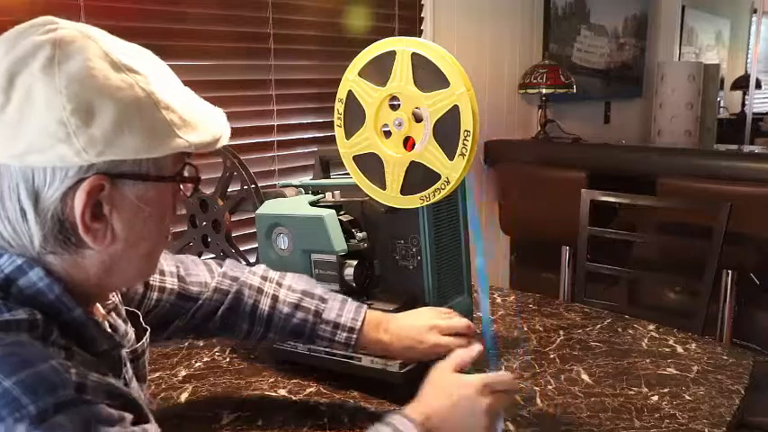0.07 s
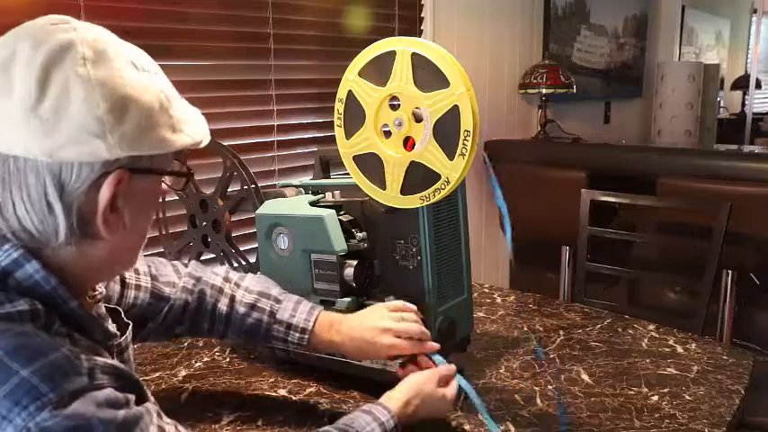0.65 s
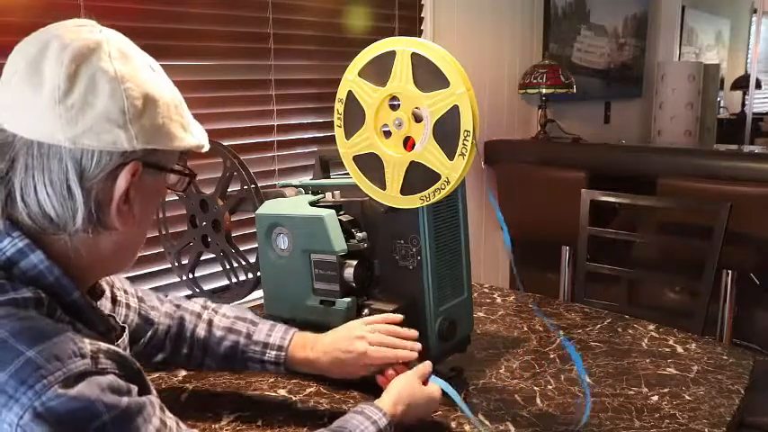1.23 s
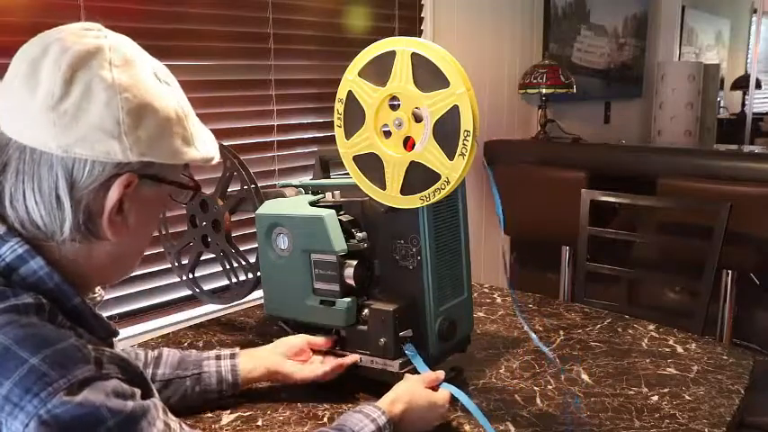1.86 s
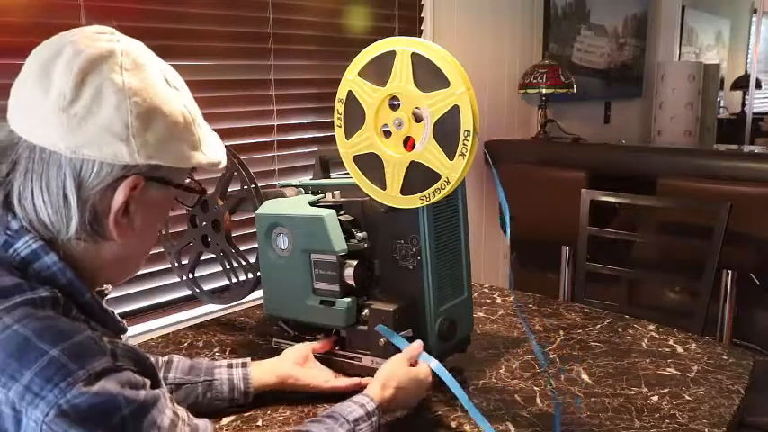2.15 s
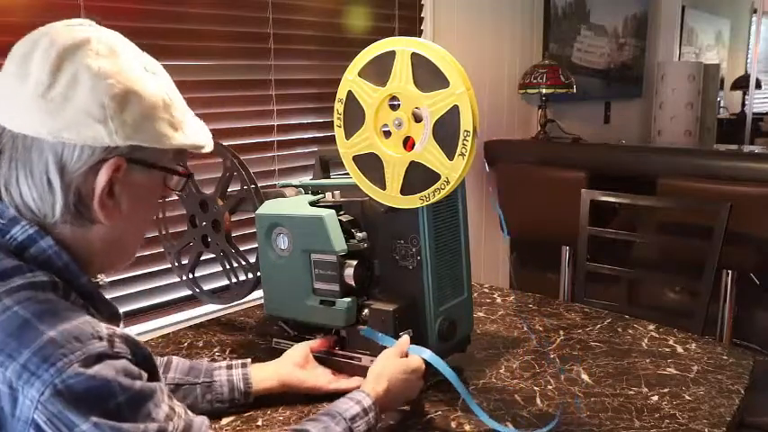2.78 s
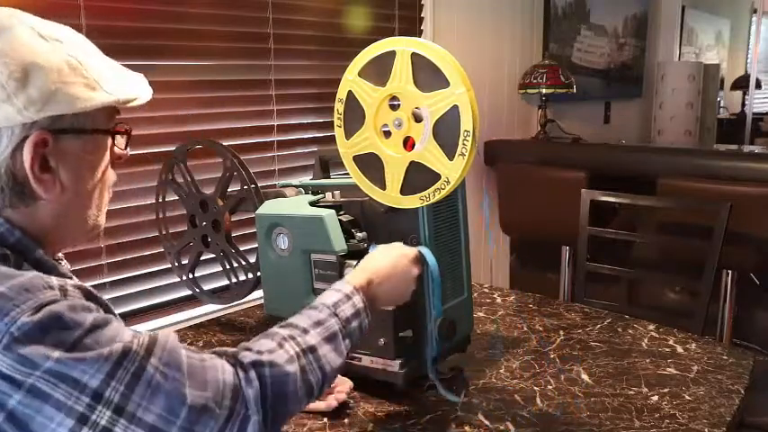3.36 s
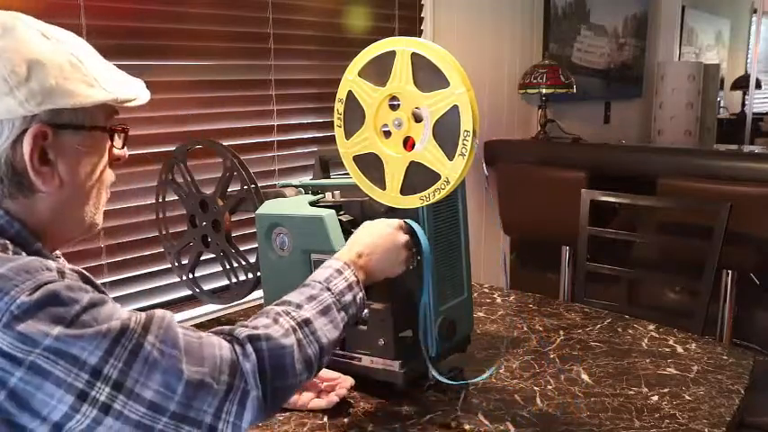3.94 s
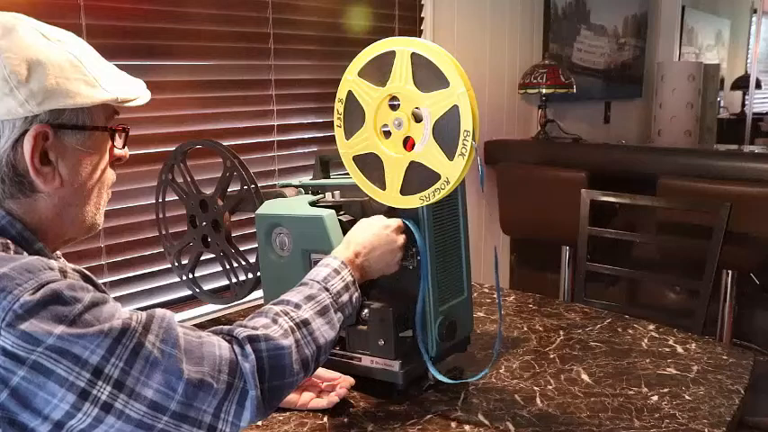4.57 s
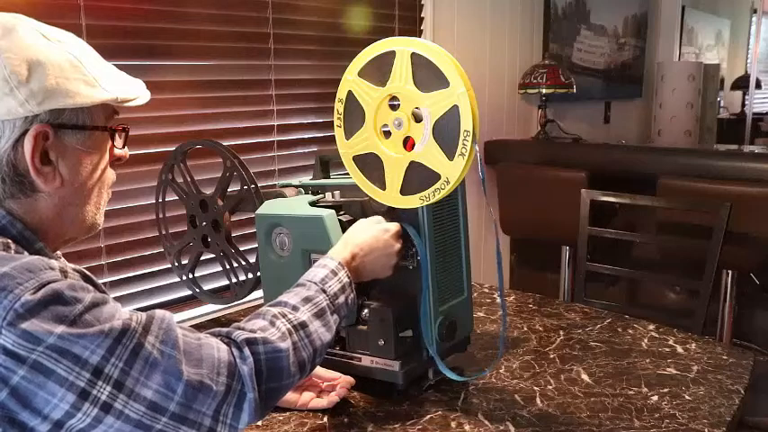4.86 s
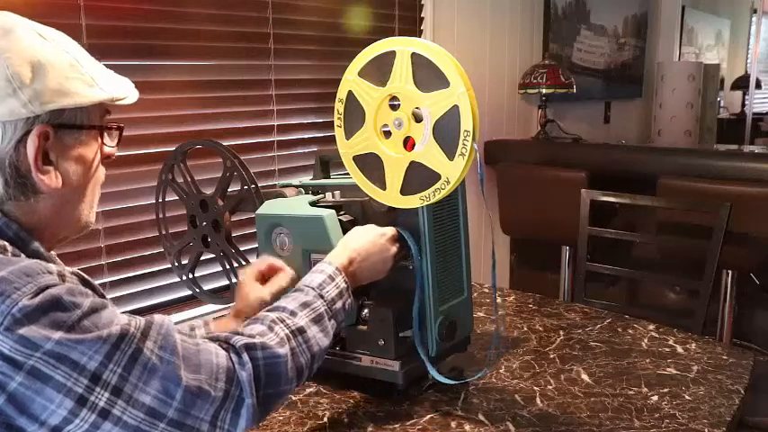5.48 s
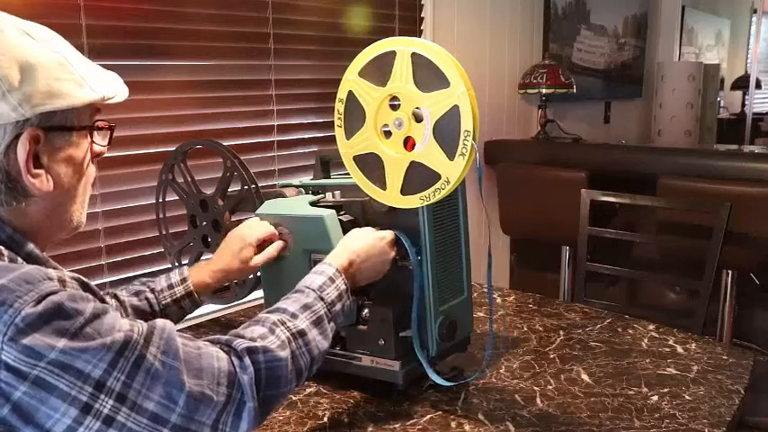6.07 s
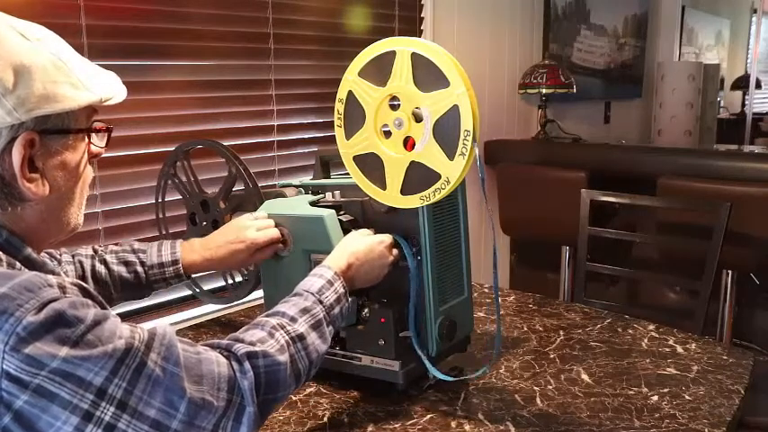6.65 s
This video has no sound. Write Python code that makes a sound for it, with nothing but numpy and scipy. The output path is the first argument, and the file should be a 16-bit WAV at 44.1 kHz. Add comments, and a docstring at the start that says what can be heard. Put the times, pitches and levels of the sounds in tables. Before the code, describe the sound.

Film rustles and ticks as a projector is threaded, with light knocks, then loud switch clunks and a brief motor whir.

```python
"""A reel projector is threaded with film leader on a table in a quiet living room.
The film rustles and ticks on the rollers; guides and latches click against the metal housing.
At the end the control knob turns with heavy clunks and the motor starts to hum and whir.
Each part has one colour and one ring; a harder contact tilts that colour towards the treble."""
import sys
import numpy as np
from scipy import signal
from scipy.fft import rfft, irfft
from scipy.io import wavfile
from scipy.ndimage import uniform_filter1d

SR = 44100
rng = np.random.default_rng(int(sys.argv[2]) if len(sys.argv) > 2 else 0)


def master_out(mix):
    """Clip the mix to full scale and print it as 16-bit PCM to the path in sys.argv[1]."""
    frames = np.transpose(np.atleast_2d(mix))
    ceiling = np.clip(frames, -1, 1)
    pcm = np.round(ceiling * 32767).astype(np.int16)
    wavfile.write(sys.argv[1], SR, pcm)


N = 296352


def amp(db):
    """Decibels to gain."""
    return 10 ** (np.asarray(db) / 20)


def unit_rms(x):
    """Scales to rms 1."""
    return x / np.sqrt(np.mean(x ** 2) + 1e-20)


def unit_energy(x):
    """Scales to energy 1 in each channel."""
    return x / np.sqrt(np.sum(x ** 2, -1, keepdims=True) + 1e-20)


def decay(t, t60):
    """A fade that falls 60 dB in t60 seconds."""
    return np.exp(-np.log(1000) * t / t60)


def curve(points, hz):
    """Reads a table of breakpoints on a log-frequency axis."""
    f, value = np.transpose(points)
    return np.interp(np.log(hz + 1), np.log(f + 1), value)


def motion(moves, attack_s, release_s, swell_db):
    """Envelope of moves: each sets in, ramps by swell_db to its base level minus swell_db, and dies."""
    t, gain = np.arange(N) / SR, np.zeros(N)
    for start, length, db in moves:
        age = np.maximum(t - start, 0)
        swell = amp(db + swell_db * (np.minimum(age / length, 1) - 2))
        release = np.exp(-np.maximum(age - length, 0) / release_s)
        gain += (1 - np.exp(-age / attack_s)) * swell * release
    return gain


def placed(s, sound):
    """A stereo track with the sound starting at time s."""
    track = np.zeros((2, N))
    part = track[:, max(round(s * SR), 0):]
    part[:, :sound.shape[1]] += sound[:, :part.shape[1]]
    return track


def stereo(x, likeness, spectrum=((1, 0), (2, 0))):
    """Colours two unrelated signals and blends them to set the stereo width at each frequency."""
    size = x.shape[1]
    hz = np.fft.rfftfreq(size, 1 / SR)
    left, other = rfft(x)
    same = np.clip(curve(likeness, hz), -1, 1)
    right = same * left + np.sqrt(1 - same ** 2) * other
    return irfft(np.array([left, right]) * amp(curve(spectrum, hz)), size)


# stereo image of the echoes and the whir: (frequency [Hz], left-right likeness [0-1])
ROOM_LIKENESS = [(100, 1), (300, 1), (700, 0.77), (1400, 0.091), (3000, 0.014), (9000, 0.025)]
# reverb time: (frequency [Hz], t60 [s])
ROOM_DECAY = [(150, 0.4), (500, 0.83), (1400, 0.7), (3700, 0.65), (9000, 0.34)]
def room(build_s=0.00068, early_db=4, early_s=0.0047, echoes_per_s=5000):
    """One echo pattern: close reflections off table and wall, then a tail that dies band by band."""
    size = SR // 2
    echoes = rng.standard_normal((2, size)) * (rng.random((2, size)) < echoes_per_s / SR)
    hz, frame_s, bands = signal.stft(stereo(echoes, ROOM_LIKENESS), SR, nperseg=256)
    bands *= decay(frame_s, curve(ROOM_DECAY, hz)[:, None])
    tail = signal.istft(bands, SR, nperseg=256)[1][:, :size]
    t = np.arange(size) / SR
    return unit_energy(tail * (1 - np.exp(-t / build_s)) * (1 + amp(early_db) * np.exp(-t / early_s)))


def resonant(peaks, hz, sharpness=13.7):
    """Gain of damped resonances, which gather the energy of the frequencies around them."""
    boosts = (db * np.exp(-(sharpness * (hz / f - 1)) ** 2) for f, db in peaks)
    gain = amp(sum(boosts, np.zeros(len(hz))))
    return gain / np.sqrt(uniform_filter1d(gain ** 2, size=260))


# the six bands of every colour, thud, body, clack, ring, snap and fizz: (edge [Hz])
COLOUR_EDGES = [130, 350, 800, 1600, 3200, 6400, 11000]
def contact(colour, hardness, top_hz, peaks=(), size=4096):
    """The pulse of one contact: the part's colour, tilted by hardness and shaped by resonances."""
    edges = np.array(COLOUR_EDGES, float)
    centres = np.sqrt(edges[1:] * edges[:-1])
    density_db = np.array(colour) - 10 * np.log10(np.diff(edges)) + hardness * np.log2(centres)
    hz = np.fft.rfftfreq(size, 1 / SR)
    low_cut = hz ** 4 / (hz ** 4 + 125 ** 4)  # small parts radiate no deep bass
    high_cut = 1 / (1 + (hz / top_hz) ** 16)
    gain = amp(curve(np.c_[centres, density_db], hz)) * low_cut * high_cut * resonant(peaks, hz)
    log_gain = np.log(np.maximum(gain / gain.max(), 1e-4))
    mirrored = np.r_[log_gain, log_gain[-2:0:-1]]
    return np.fft.ifft(np.exp(np.conj(signal.hilbert(mirrored)))).real  # minimum phase: a sharp attack


def scrape(envelope):
    """Many tiny contacts under an envelope, favouring no pitch."""
    force = envelope * rng.standard_normal(len(envelope))
    for _ in range(2):  # flatten the spectrum, then restore the envelope
        force = irfft(np.exp(1j * np.angle(rfft(force))), len(force))
        force *= envelope / np.sqrt(uniform_filter1d(force ** 2, 64) + 1e-12)
    return unit_energy(force)


def ringing(modes, spot_db=2):
    """The ring of a struck metal part; each spot struck favours other modes."""
    longest_s = max(t60 for _, _, t60 in modes)
    t = np.arange(SR // 10 + int(SR * longest_s / 2)) / SR
    ring = np.zeros(len(t))
    for hz, db, t60 in modes:
        gain = amp(db + spot_db * rng.standard_normal())
        ring += gain * decay(t, t60) * np.sin(2 * np.pi * (hz * t + rng.random()))
    return unit_energy(ring)


def blow(s, db, colour, modes, scrape_s, graze_s, crack_db, ring_db, room_db, top_hz,
         hardness=0, peaks=()):
    """A part grazes, hits with a crack and scrapes to rest; the metal rings and the room answers."""
    lead = SR // 100  # samples of graze before the crack
    t = (np.arange(4096) - lead) / SR
    force = scrape(np.exp(np.minimum(t / graze_s, -t / scrape_s)))
    force[lead] += amp(crack_db)
    hit = unit_energy(signal.fftconvolve(force, contact(colour, hardness, top_hz, peaks)))
    ring = signal.fftconvolve(unit_energy(contact(colour, hardness, top_hz)), ringing(modes))
    direct = amp(ring_db) * np.pad(ring, (lead, 0))
    direct[:len(hit)] += hit
    heard = amp(room_db) * signal.fftconvolve(direct[None], room(), axes=1)
    heard[:, :len(direct)] += direct
    return placed(s - lead / SR, amp(db) * heard)


# pulls of film through the fingers: (start [s], length [s], base level [dB])
FILM_PULLS = [(-0.01, 0.097, -37.5), (1.705, 0.034, -53), (2.04, 0.042, -50.5), (2.22, 0.037, -51),
              (2.333, 0.021, -54), (2.62, 0.045, -53.5)]
# their papery rustle: (frequency [Hz], level [dB])
FILM_SPECTRUM = [(400, -13), (800, -8.5), (1150, 0.5), (1600, 0), (2100, 6), (2600, 9.5), (3300, 0.5),
                 (4600, 1), (7500, -4.5), (11000, -11.5)]
def film_slide(grain_db=2, grains_per_s=2500):
    """The film edge catches and slips in tiny grains; each pull swells until it ends."""
    grains = (rng.random(N) < grains_per_s / SR) * rng.choice([-1, 1], N)
    grains = grains * amp(grain_db * np.minimum(rng.exponential(1, N), 4))
    colour = amp(curve(FILM_SPECTRUM, np.fft.rfftfreq(N, 1 / SR)))
    rub = unit_rms(irfft(rfft(grains) * colour, N))
    rub *= motion(FILM_PULLS, attack_s=0.00074, release_s=0.014, swell_db=2)
    return rub + signal.fftconvolve(rub[None], room(), axes=1)[:, :N]


# room tone: (frequency [Hz], level [dB])
AIR_SPECTRUM = [(12, -21.5), (20, -6), (43, -3), (59, -7), (137, -7), (170, -11.5), (221, -7), (337, -11.5),
                (375, -11.5), (475, -12.5), (542, -13), (872, -16), (1110, -16), (8910, -25.5),
                (11000, -31.5), (14300, -82), (22000, -120)]
# its image, centred lows and wide highs: (frequency [Hz], left-right likeness [0-1])
AIR_LIKENESS = [(60, 1), (130, 0.79), (270, 0.74), (570, 0.35), (1190, 0.12), (2520, 0.22), (5330, 0.21),
                (11200, 0.033)]
def air(gain_db=-52):
    """Steady rumble and hiss of the still room."""
    return amp(gain_db) * unit_rms(stereo(rng.standard_normal((2, N)), AIR_LIKENESS, AIR_SPECTRUM))


# arms moving on the table: (start [s], length [s], base level [dB])
ARM_MOVES = [(0, 3, -60.5)]
# their deep rumble: (frequency [Hz], level [dB])
ARM_SPECTRUM = [(12, -12), (35, 0.5), (60, -2), (130, -12), (250, -36), (1000, -70), (22000, -120)]
def arms():
    """The table rumbles faintly while the arms shift on it."""
    rumble = unit_rms(stereo(rng.standard_normal((2, N)), AIR_LIKENESS, ARM_SPECTRUM))
    return rumble * motion(ARM_MOVES, attack_s=0.011, release_s=0.11, swell_db=-0.5)


# light ticks: (time [s], level [dB], hardness [dB/octave], scrape [s], pitch [Hz], resonance [dB])
FILM_FLICKS = [(0.055, -17.5, -3, 0.0034, 2360, 28), (0.1288, -14, 4.5, 0.0022, 6370, 4),
               (0.6508, -19.5, -3, 0.018, 3050, 6), (0.8398, -17, 1, 0.0083, 4700, 4),
               (0.902, -14.5, 5.5, 0.002, 6360, 11), (0.908, -29, -2, 0.0015, 3200, 9),
               (0.9505, -18, -1.5, 0.0066, 3120, 13), (0.958, -22, -2.5, .005, 4100, 5),
               (1.032, -20.5, 1, 0.0077, 4740, 6), (1.18, -26, -4.5, 0.015, 2900, 14),
               (1.569, -24.5, 2, 0.011, 6400, 6), (1.719, -25, -2.5, 0.013, 5230, 10),
               (1.7425, -22.5, -3.5, 0.01, 3080, 20), (2.245, -23.5, -6.5, 0.0083, 3350, 16),
               (2.343, -24, -5, 0.014, 4300, 24), (2.584, -27, -2.5, .005, 2500, 14),
               (3.185, -24.5, 1, 0.0085, 3950, -1), (3.736, -32.5, 8, .005, 4500, 1),
               (4.328, -17.5, 7, 0.016, 4300, -8), (4.426, -24, -6, 0.014, 1500, -3)]
# thin and snappy: (level [dB]) per band
FLICK_COLOUR = [-24.5, -20.5, -12, -6, -1, -8.5]
# the rollers' brief ring: (frequency [Hz], level [dB], t60 [s])
ROLLER_MODES = [(1520, -3, .03), (3020, 0, .025), (6200, -1, .02)]
def film_ticks():
    """The stiff film flicks against the rollers; harder flicks are brighter."""
    return sum(blow(s, db, FLICK_COLOUR, ROLLER_MODES, scrape_s, graze_s=0.00052, crack_db=-6,
                    ring_db=-15, room_db=0.5, top_hz=10100, hardness=hardness, peaks=[(hz, peak_db)])
               for s, db, hardness, scrape_s, hz, peak_db in FILM_FLICKS)


# guide clacks: (time [s], level [dB], hardness [dB/octave], pitch [Hz], resonance [dB])
GUIDE_HITS = [(1.8265, -13.5, 0.5, 1140, 4), (1.831, -16, 0.5, 1470, 14), (1.838, -17, -3, 620, 8)]
# mid-heavy: (level [dB]) per band
GUIDE_COLOUR = [-27, -9.5, -1, -5, -15, -14]
# a short, hollow ring: (frequency [Hz], level [dB], t60 [s])
GUIDE_MODES = [(590, 3, .08), (650, 2, .08), (735, 1, .07), (1100, 0, .07), (1245, -1, .08),
               (1335, -1, .07), (1495, 0, .06)]
def film_guide():
    """The lower film guide swings open and settles."""
    return sum(blow(s, db, GUIDE_COLOUR, GUIDE_MODES, scrape_s=0.0069, graze_s=0.00098, crack_db=-15,
                    ring_db=-16, room_db=0, top_hz=9550, hardness=hardness, peaks=[(hz, peak_db)])
               for s, db, hardness, hz, peak_db in GUIDE_HITS)


# case knocks: (time [s], level [dB], hardness [dB/octave], scrape [s], pitch [Hz], resonance [dB])
HOUSING_HITS = [(2.037, -17.5, -1, 0.016, 1240, 13), (2.038, -21.5, -1, 0.012, 1805, 19),
                (2.043, -21.5, 10, 0.061, 5180, 23), (2.465, -17.5, 2, 0.0057, 935, 9),
                (2.494, -14, 2.5, 0.01, 2180, 4), (2.5, -22.5, -4, 0.0092, 858, 11),
                (2.497, -22.5, 27, 0.0081, 7300, 3), (2.8615, -17.5, -2, 0.0086, 910, 8),
                (2.874, -19, 6, 0.0069, 1270, 17), (2.88, -21.5, -4.5, .008, 537, 11),
                (3.002, -21.5, -4.5, .014, 900, 5), (6.025, -16, -3, 0.023, 1050, -5),
                (6.052, -13, 6, 0.0059, 5000, -4), (6.1222, -11, -1.5, 0.015, 1220, 4)]
# broad mids: (level [dB]) per band
HOUSING_COLOUR = [-12, -3.5, 0, 0, -4.5, -16.5]
# the case's metallic ring: (frequency [Hz], level [dB], t60 [s])
HOUSING_MODES = [(259, 6, .35), (290, 2, .3), (322, 2, .35), (450, -2, .15), (624, 1, .15), (690, 2, .35),
                 (767, -4, .3), (890, -1, .3), (1035, -2, .25), (1101, -2, .25), (1198, -3, .25),
                 (1241, 1, .3), (1314, -3, .3), (1357, -3, .25), (1462, 6, .3), (1522, -1, .25),
                 (1690, -1, .2), (1955, 4, .2), (2226, 0, .2), (2680, 2, .2), (2870, 0, .2), (4650, 2, .12),
                 (5044, 0, .08)]
def housing_knocks():
    """Guides, levers and knuckles set the metal case ringing, each spot with its own pitch."""
    return sum(blow(s, db, HOUSING_COLOUR, HOUSING_MODES, scrape_s, graze_s=0.0014, crack_db=-13.5,
                    ring_db=-15.5, room_db=0, top_hz=9900, hardness=hardness, peaks=[(hz, peak_db)])
               for s, db, hardness, scrape_s, hz, peak_db in HOUSING_HITS)


# soft bumps: (time [s], base level [dB], pitch [Hz])
HAND_BUMPS = [(2.138, -17.5, 124), (2.151, -16, 139), (2.192, -22.5, 130), (2.657, -22, 120),
              (2.686, -21, 101), (3.194, -25, 150)]
# muffled, nearly all thud: (level [dB]) per band
BUMP_COLOUR = [0.5, -18, -26, -33, -24, -32]
def hand_bumps(case_db=-4, thud_db=-19, thud_t60=0.076, rise_s=0.0016):
    """The heel of the hand rocks the case on the table with a low thud."""
    out, t = np.zeros((2, N)), np.arange(SR // 5) / SR
    for s, db, hz in HAND_BUMPS:
        thud = np.sin(2 * np.pi * hz * t) * (1 - np.exp(-t / rise_s)) * decay(t, thud_t60)
        out += placed(s, amp(db + thud_db) * thud[None])
        out += blow(s, db + case_db, BUMP_COLOUR, HOUSING_MODES, scrape_s=0.0046, graze_s=0.0016,
                    crack_db=-3, ring_db=-16.5, room_db=-1, top_hz=10000)
    return out


# cover knocks: (time [s], level [dB], hardness [dB/octave], pitch [Hz], resonance [dB])
COVER_HITS = [(3.0712, -14, 2.5, 1670, 11), (3.1841, -6, 0.7, 2150, 2), (3.195, -16.5, -3, 450, 8),
              (3.208, -18, 2, 2100, 6), (3.246, -19.5, -1.5, 1060, 6)]
# forward upper mids: (level [dB]) per band
COVER_COLOUR = [-10.5, -9, -0.5, 4.5, -12, -7]
# the cover's ring: (frequency [Hz], level [dB], t60 [s])
COVER_MODES = [(453, 2, .12), (555, 2, .12), (662, 1, .1), (887, 5, .1), (1055, 3, .1), (1435, 2, .09),
               (1590, 2, .1), (1900, 2, .08), (2065, 2, .08), (2205, 2, .08), (2500, 0, .05)]
def front_cover():
    """The front cover touches, knocks shut and rattles to rest."""
    return sum(blow(s, db, COVER_COLOUR, COVER_MODES, scrape_s=0.0077, graze_s=0.00014, crack_db=-3.5,
                    ring_db=-16.5, room_db=0.5, top_hz=3180, hardness=hardness, peaks=[(hz, peak_db)])
               for s, db, hardness, hz, peak_db in COVER_HITS)


# catch clicks: (time [s], level [dB])
CATCH_HITS = [(4.17, -15), (4.1723, -1.5), (4.181, -17)]
# crisp and bright: (level [dB]) per band
CATCH_COLOUR = [-23, -32, -13, -7.5, -4.5, 0.5]
# damped resonances of the spring: (frequency [Hz], boost [dB])
CATCH_PEAKS = [(1900, 1.5), (2850, 5), (3650, 3), (4450, 4), (5350, 7), (7100, 4), (7900, 1.5)]
# a tiny ping: (frequency [Hz], level [dB], t60 [s])
CATCH_MODES = [(2850, -2, .02), (5400, 0, .02), (6550, -2, .02), (7120, -1, .02), (7520, 0, .02),
               (7950, 0, .02)]
def spring_catch():
    """A spring catch slips, snaps home and rebounds."""
    return sum(blow(s, db, CATCH_COLOUR, CATCH_MODES, scrape_s=0.0011, graze_s=0.00028, crack_db=-9.5,
                    ring_db=-14.5, room_db=-0.5, top_hz=9460, peaks=CATCH_PEAKS)
               for s, db in CATCH_HITS)


# one soft tap: (time [s], level [dB])
KNOB_HIT = (5.769, -13.5)
# even, with a soft top: (level [dB]) per band
KNOB_COLOUR = [-0.5, -3, -2, -2, -3, -9]
# damped resonances of the knob: (frequency [Hz], boost [dB])
KNOB_PEAKS = [(560, 7), (1320, 8), (1950, 11)]
# the knob's ring: (frequency [Hz], level [dB], t60 [s])
KNOB_MODES = [(549, -4, .07), (1314, -1, .07), (1464, -4, .07), (1680, -2, .07), (1938, 2, .12),
              (2186, -3, .08), (3620, -8, .08)]
def knob_tap():
    """Fingers land on the control knob."""
    return blow(*KNOB_HIT, KNOB_COLOUR, KNOB_MODES, scrape_s=0.011, graze_s=0.0016, crack_db=-12,
                ring_db=-10.5, room_db=1, top_hz=10300, peaks=KNOB_PEAKS)


# lever throws and bounces: (time [s], level [dB], hardness [dB/octave], scrape [s])
LEVER_HITS = [(6.3745, -7, 7, 0.0014), (6.4572, -4.5, 5.5, 0.0054), (6.464, 1, 0.5, 0.0049),
              (6.48, -2.5, -2.5, 0.0067), (6.554, 7, 3, 0.0021), (6.5567, 8, 1, 0.0035),
              (6.5619, 6.5, 0.5, 0.0076), (6.580, 2, -0.5, .004), (6.586, 3.5, -2, 0.0049),
              (6.6003, 0.5, 11.5, 0.0045), (6.602, -0.5, -5.5, 0.0089)]
# a hard clack: (level [dB]) per band
LEVER_COLOUR = [-14, -7.5, 2, -0.5, -3.5, -12]
# damped resonances of the levers: (frequency [Hz], boost [dB])
LEVER_PEAKS = [(1100, 4.5), (1480, 4.5), (1950, 5.5), (2220, 6.5), (2750, 1), (3350, 9), (4130, 5.5),
               (4750, 12.5), (5550, 10.5), (6550, 6), (7500, 0), (8600, 0)]
def levers():
    """The knob throws heavy levers, which rattle in and set the case ringing."""
    return sum(blow(s, db, LEVER_COLOUR, HOUSING_MODES, scrape_s, graze_s=0.00095, crack_db=-10.5,
                    ring_db=-13.5, room_db=0.5, top_hz=10500, hardness=hardness, peaks=LEVER_PEAKS)
               for s, db, hardness, scrape_s in LEVER_HITS)


# the big clunk: (time [s], level [dB])
DETENT_HIT = (6.3767, 13.1)
# full body with a snap on top: (level [dB]) per band
DETENT_COLOUR = [-7, 0.5, -4.5, -4, -1, -14]
# damped resonances of the detent: (frequency [Hz], boost [dB])
DETENT_PEAKS = [(1950, 9.5), (2750, 11), (3100, 9), (3900, 12), (4420, 5), (4900, 12), (5450, 13),
                (6150, 16)]
def detent():
    """The control knob drops into its detent, shaking case and table."""
    clunk = blow(*DETENT_HIT, DETENT_COLOUR, HOUSING_MODES, scrape_s=0.00166, graze_s=0.0012,
                 crack_db=-23, ring_db=-13.5, room_db=-10, top_hz=6230, peaks=DETENT_PEAKS)
    return clunk + panel_boom(DETENT_HIT[0]) + table_jolt(DETENT_HIT[0])


# the side panel's boom: (frequency [Hz], level [dB], t60 [s])
PANEL_MODES = [(280, -4.5, .022), (257, -18, .34), (322, -27, .25)]
def panel_boom(s, low_cut_hz=160):
    """The side of the case flexes under a clunk and booms on."""
    t = np.arange(SR // 2) / SR
    flex = sum(amp(db) * np.sin(2 * np.pi * hz * t) * decay(t, t60) for hz, db, t60 in PANEL_MODES)
    low_cut = signal.butter(4, low_cut_hz, "high", fs=SR, output="sos")
    return placed(s, signal.sosfilt(low_cut, flex)[None])


def table_jolt(s, hz=48, db=-38, t60=0.18):
    """The jolted table puts a deep thump under a heavy hit."""
    t = np.arange(SR // 2) / SR
    thump = amp(db) * np.sin(2 * np.pi * hz * t) * decay(t, t60)
    return placed(s, thump[None])


# a brief run after the knob, then another with the levers: (start [s], length [s], base level [dB])
MOTOR_RUNS = [(6.381, 0.1, -25.5), (6.56, .17, -29.5)]
# fan and gear noise: (frequency [Hz], level [dB])
WHIR_SPECTRUM = [(47, -40), (90, -17), (205, -1.5), (270, -3), (416, -13), (615, -4), (1070, -6),
                 (1830, -10.5), (3930, -8.5), (4540, -16), (5130, -13), (5810, -20), (8770, -24.5),
                 (11000, -33), (14300, -62), (22000, -120)]
# motor tones: (frequency [Hz], level against the whir [dB])
HUM_TONES = [(118, -22), (236, -27), (322, -19)]
def motor(claw_hz=24, chatter=0.8, ring_db=-10):
    """Fan and gears whir, pulsing with each claw stroke and ringing the case, over the motor's hum."""
    t = np.arange(N) / SR
    running = motion(MOTOR_RUNS, attack_s=0.018, release_s=0.031, swell_db=-1)
    stroke = 1 + chatter * np.exp(-(t * claw_hz % 1) / 0.15)
    noise = stereo(rng.standard_normal((2, N)), ROOM_LIKENESS, WHIR_SPECTRUM)
    whir = running * unit_rms(noise * stroke)
    case = signal.fftconvolve(whir, ringing(HOUSING_MODES)[None], axes=1)[:, :N]
    hum = sum(np.sqrt(2) * amp(db) * np.sin(2 * np.pi * (hz * t + rng.random())) for hz, db in HUM_TONES)
    return whir + amp(ring_db) * whir.std() * unit_rms(case) + running * hum


# the last sharp click: (time [s], level [dB])
CLUTCH_HIT = (6.6662, 8.3)
# mostly snap and fizz: (level [dB]) per band
CLUTCH_COLOUR = [-11, -13, -4.5, -10, -2, 2]
# damped resonances of the clutch: (frequency [Hz], boost [dB])
CLUTCH_PEAKS = [(3700, 15), (4300, 15), (5600, -6), (7600, 13), (8500, 13), (9050, 10)]
# a short, bright ring: (frequency [Hz], level [dB], t60 [s])
CLUTCH_MODES = [(300, -1, .04), (4100, -1, .02), (4900, -2, .02), (8330, 2, .018), (8550, 3, .015),
                (8950, 3, .015)]
def clutch():
    """The drive clutch clicks in and jolts the table."""
    click = blow(*CLUTCH_HIT, CLUTCH_COLOUR, CLUTCH_MODES, scrape_s=0.0028, graze_s=0.00062,
                 crack_db=-31, ring_db=-3.5, room_db=-6, top_hz=9100, peaks=CLUTCH_PEAKS)
    return click + table_jolt(CLUTCH_HIT[0])


def scene():
    """Hands at work, then the machine, over the still room; the mix leans slightly right."""
    film = film_slide() + film_ticks()
    knocks = housing_knocks() + hand_bumps()
    fittings = film_guide() + front_cover() + spring_catch() + knob_tap()
    hands = film + knocks + fittings + arms()
    machine = detent() + levers() + clutch() + motor()
    return (hands + machine + air()) * amp([[-0.3], [0.3]])


def record(dry, ceiling=0.9, top_hz=11050):
    """Soft clipping rounds the loudest peaks; a steep low-pass trims the top."""
    low_pass = signal.firwin(401, top_hz, window=("kaiser", 9), fs=SR)
    return signal.oaconvolve(ceiling * np.tanh(dry / ceiling), low_pass[None], "same")


dry = scene()
out = record(dry)
master_out(out)
```